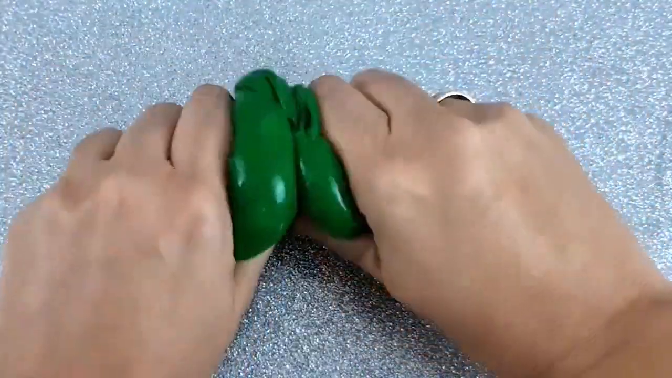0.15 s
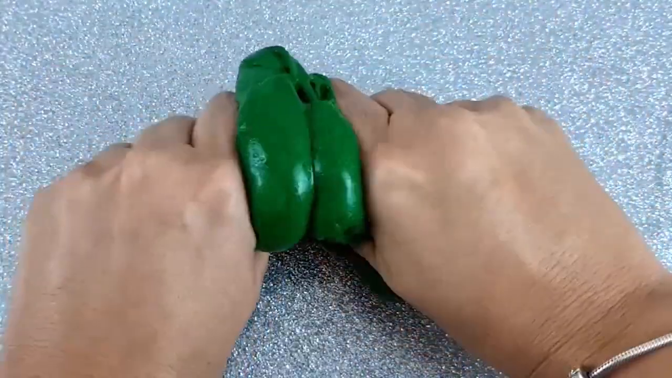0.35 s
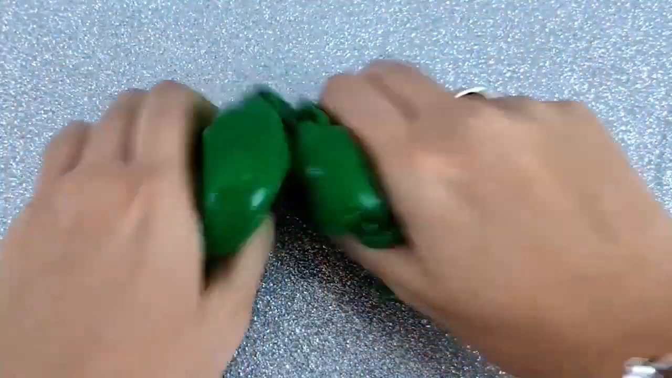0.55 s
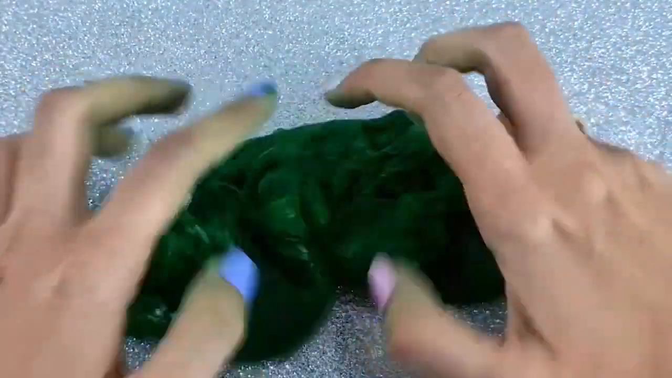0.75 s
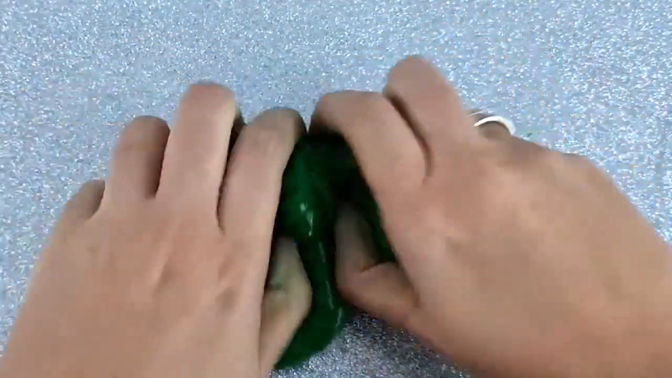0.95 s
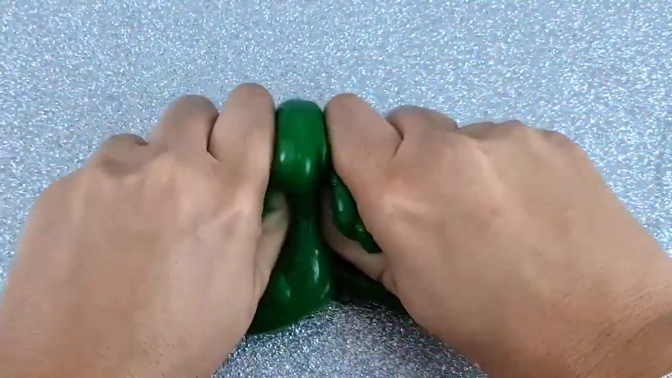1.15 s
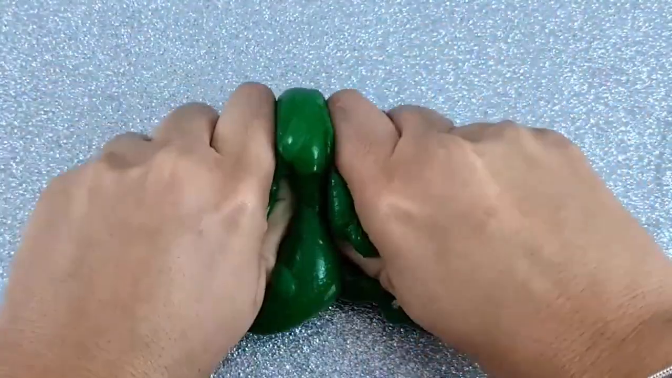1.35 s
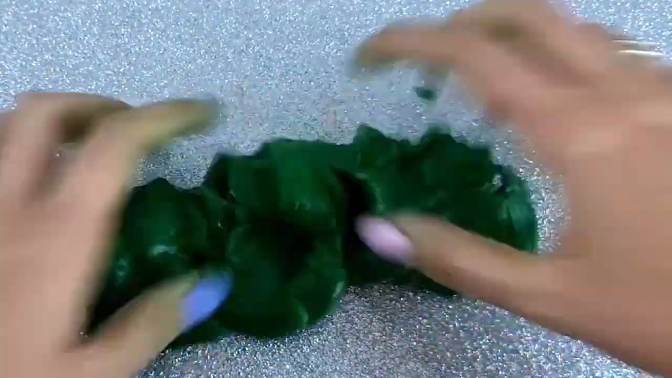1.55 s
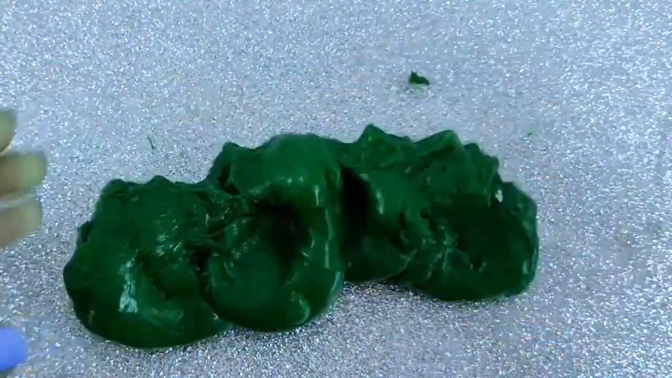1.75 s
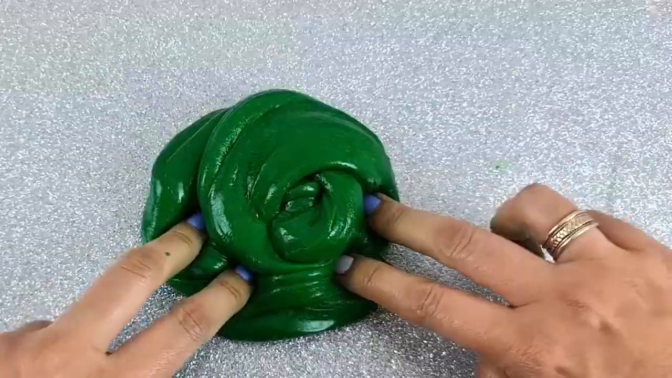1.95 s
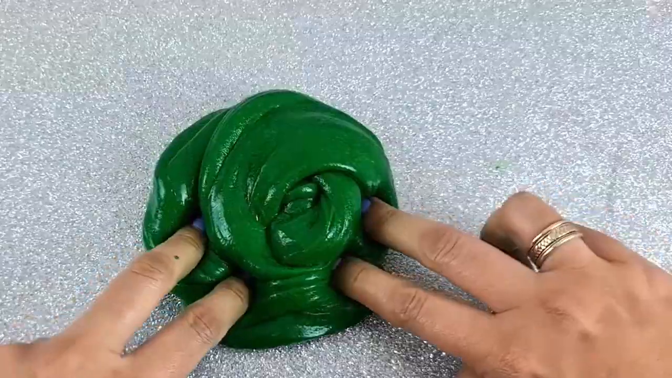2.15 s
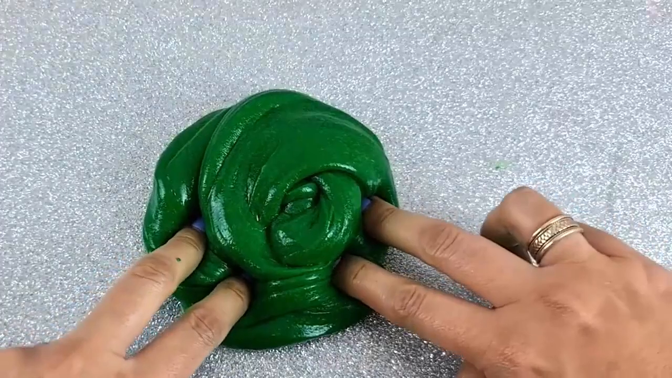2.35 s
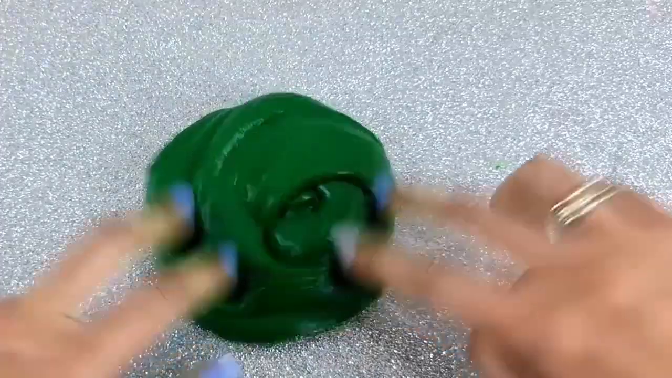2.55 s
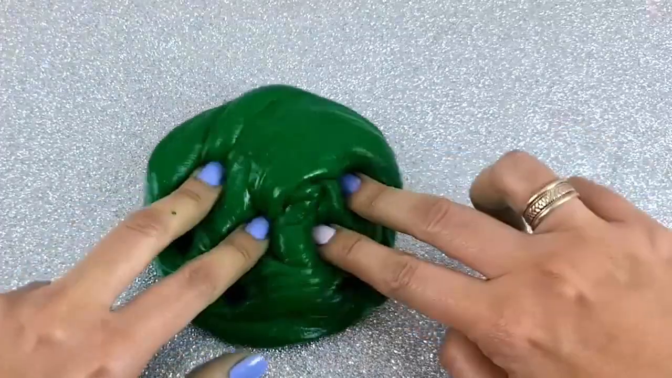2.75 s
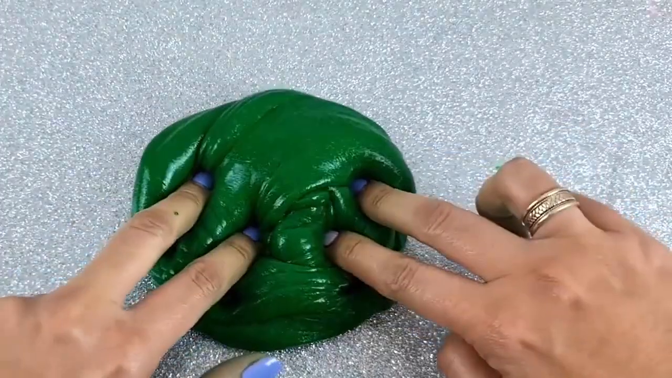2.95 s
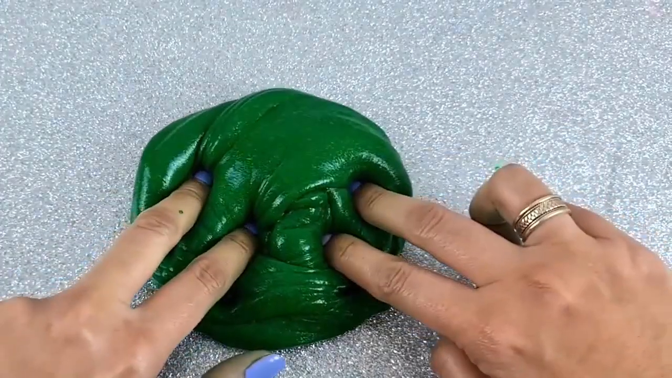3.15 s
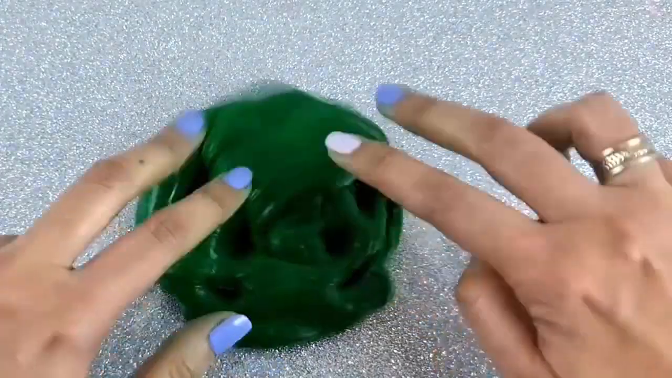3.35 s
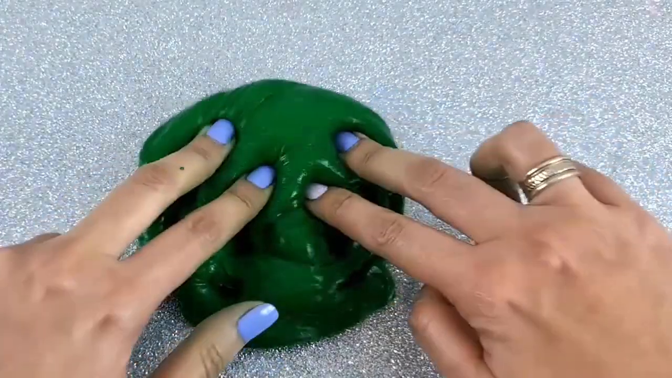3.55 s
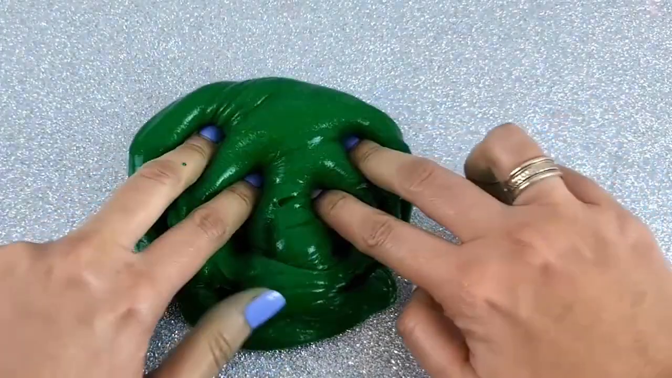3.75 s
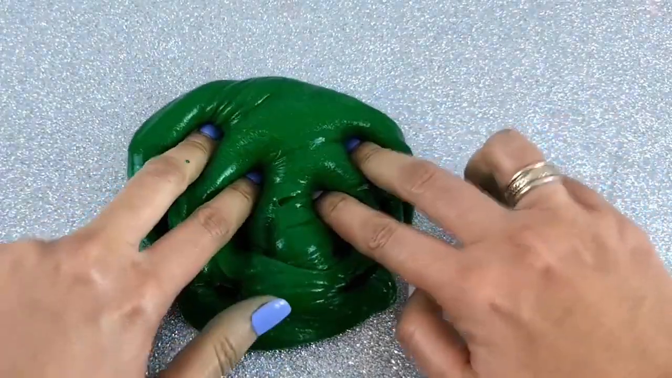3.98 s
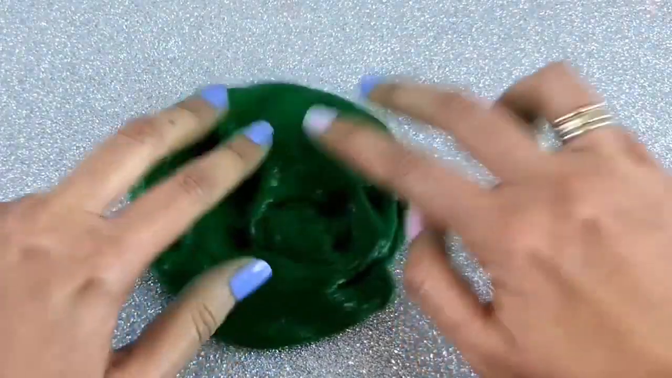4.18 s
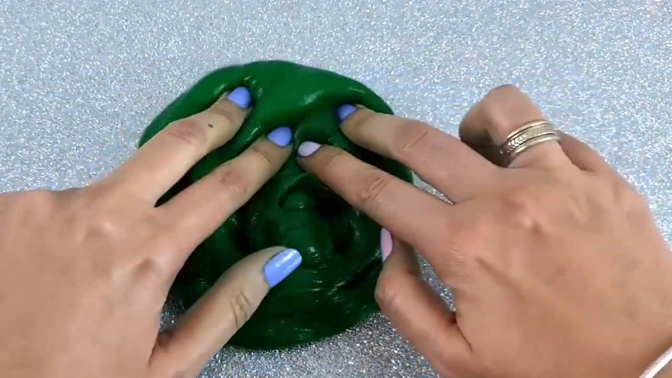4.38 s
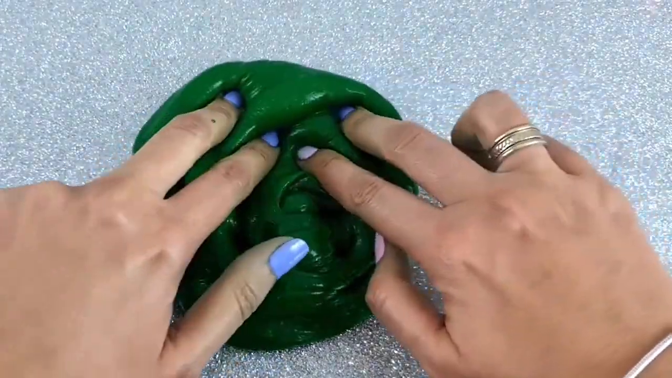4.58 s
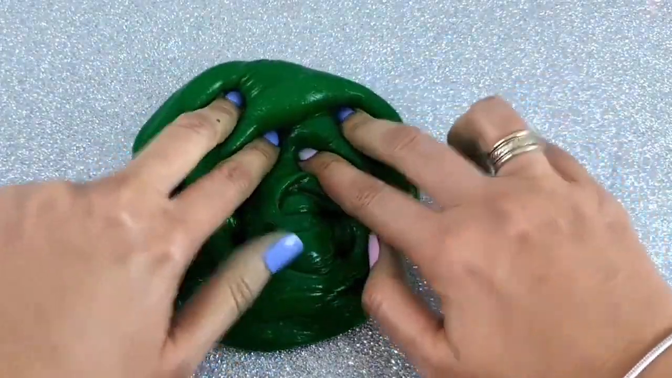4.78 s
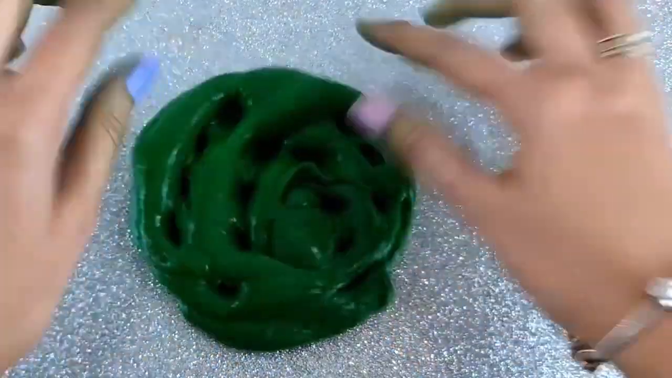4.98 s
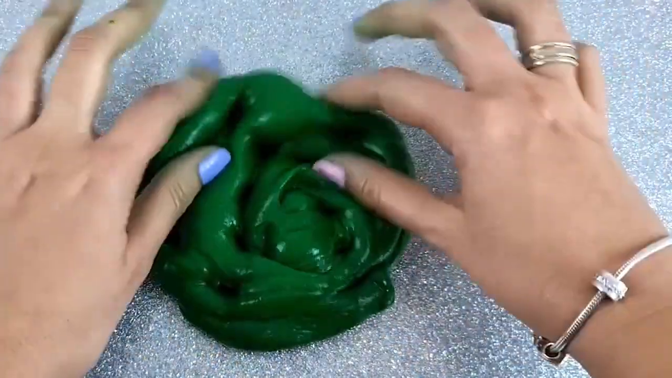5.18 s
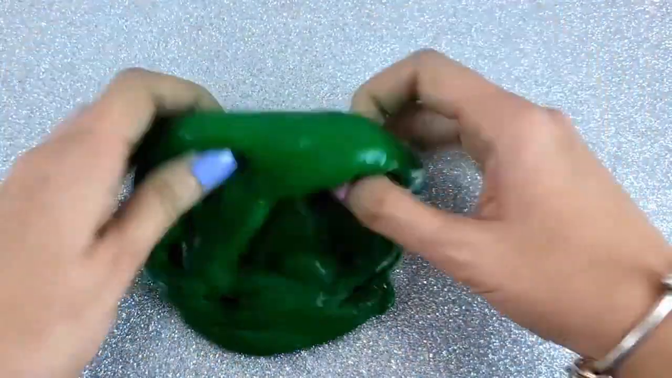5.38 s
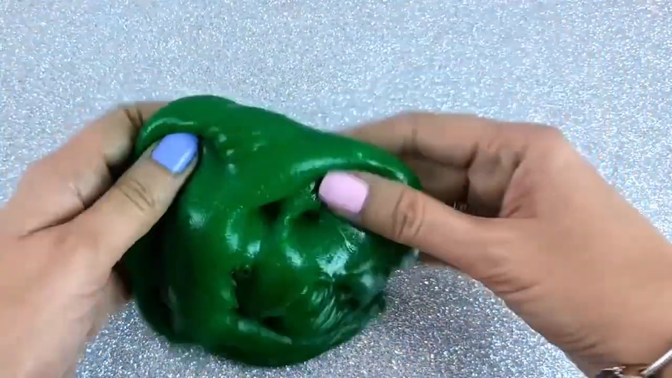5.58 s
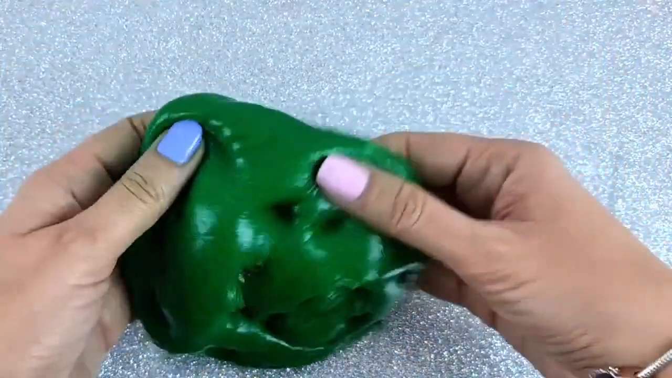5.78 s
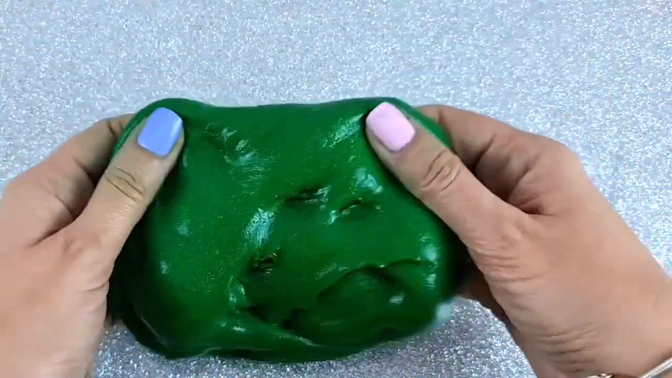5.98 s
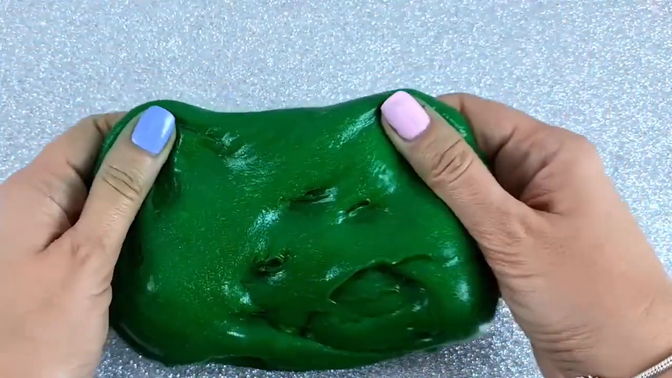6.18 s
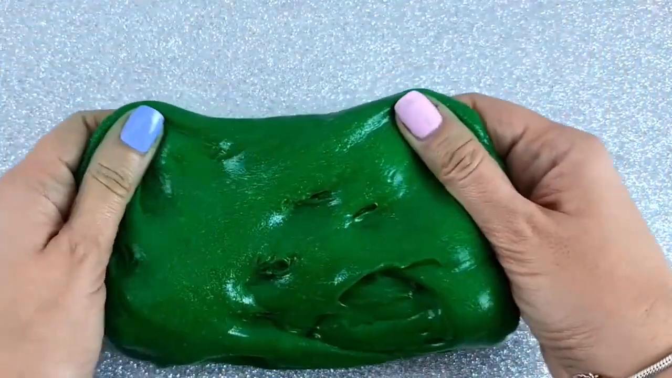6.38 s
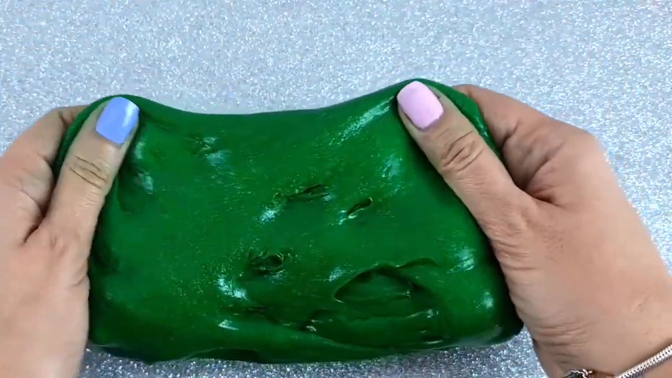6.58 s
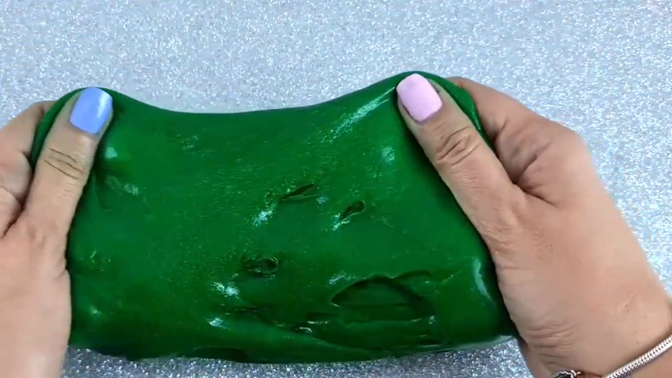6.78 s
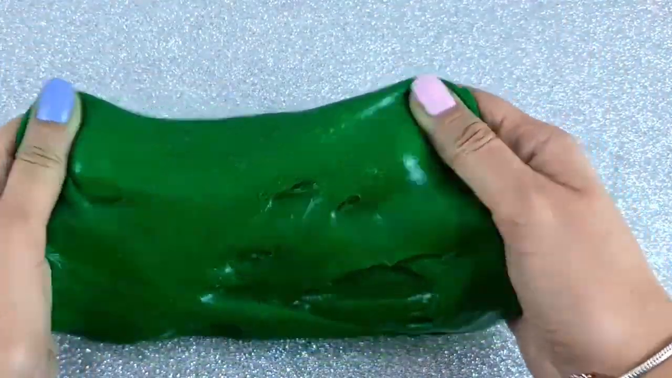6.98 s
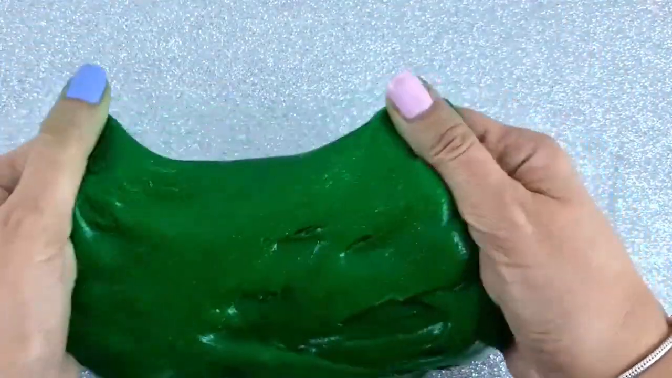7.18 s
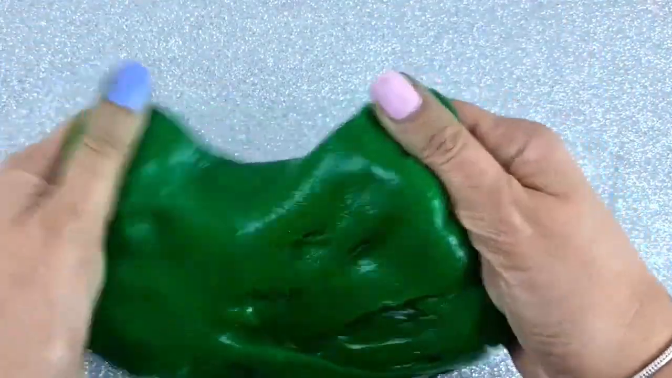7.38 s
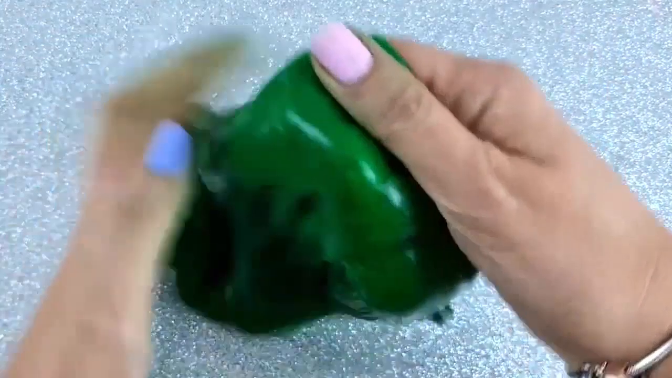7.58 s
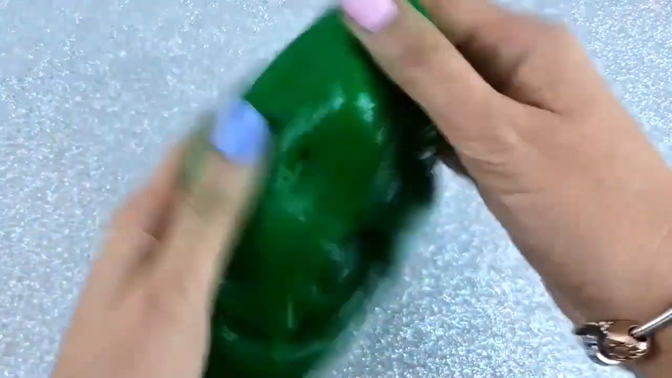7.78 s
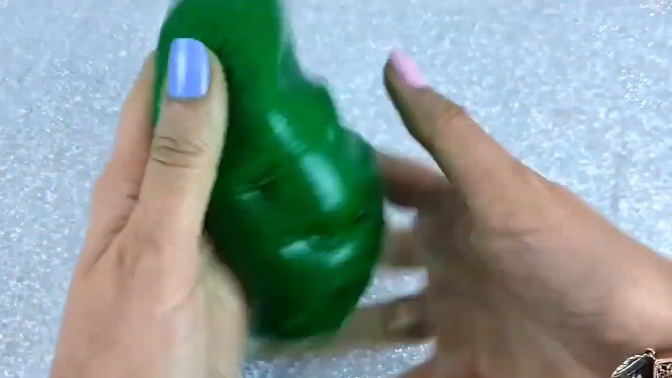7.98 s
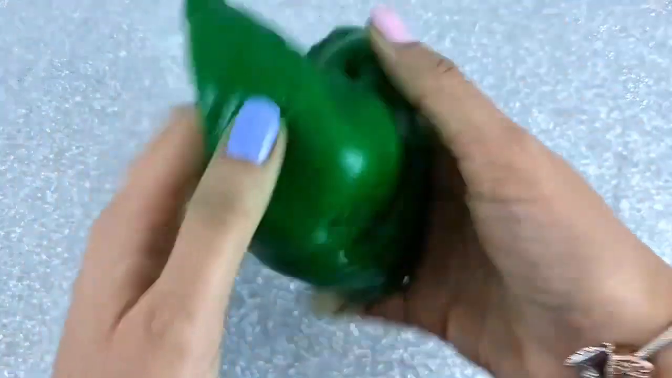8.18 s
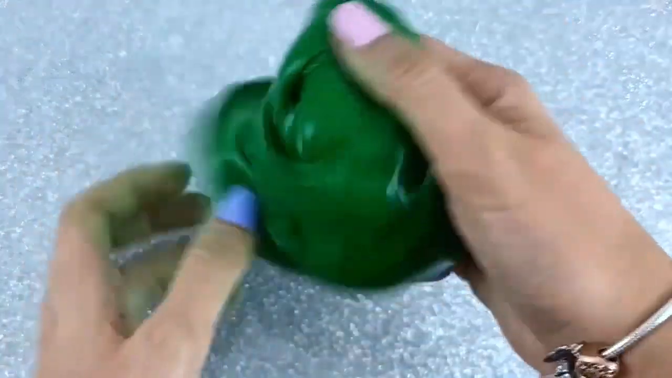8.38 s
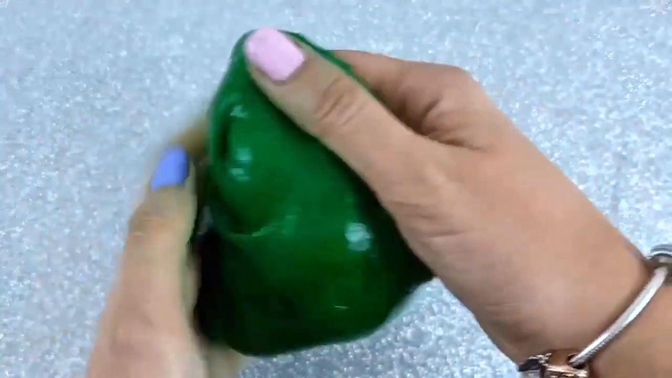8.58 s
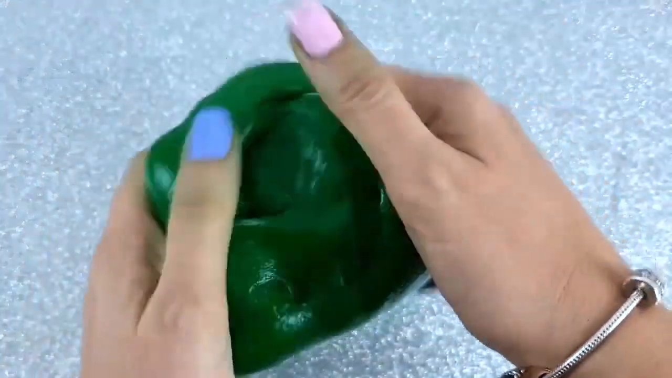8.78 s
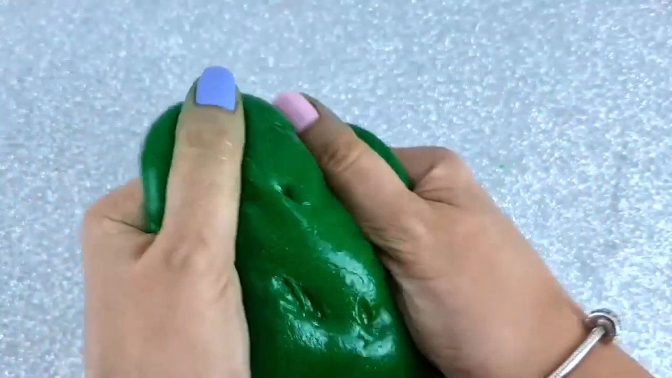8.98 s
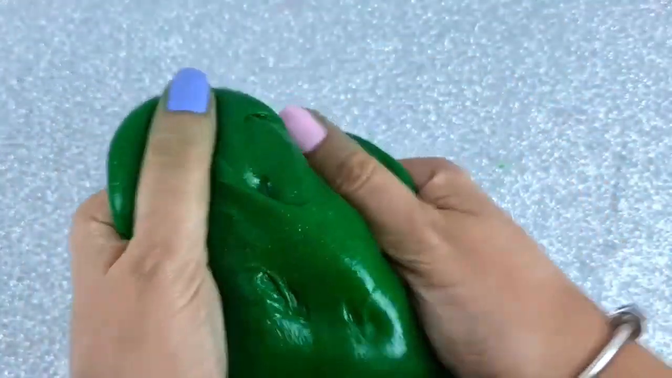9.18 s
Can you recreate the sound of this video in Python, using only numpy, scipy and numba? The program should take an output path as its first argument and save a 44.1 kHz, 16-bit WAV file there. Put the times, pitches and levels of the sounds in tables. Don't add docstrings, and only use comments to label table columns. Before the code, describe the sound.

Very close stereo phone pickup of thick wet slime handled on a table in a small hard room, with faint hiss and low air rumble. From 0 s a wet crackle builds quickly into a dense volley of hollow pops and bright snaps, peaking and clipping near 0.37 s. Smaller pops and squelches follow to 0.8 s, then another squeeze from 1.15 to 1.45 s and a loud pop at 1.67 s. After near quiet, abrupt clusters of pops with sharp tearing clicks and low table thumps strike at 2.67, 3.45, 4.22 and 5.0 s, each decaying in under half a second. A soft squish comes at 5.4 s. Stretching from 6 to 7.3 s gives only fine high ticks and fizz. Wet snaps at 7.39 and 7.55 s lead to squelchy folding and small ringing bubbles until 8.9 s. Loud pops and snaps, with a tiny squeak, erupt at 9.06-9.2 s.

```python
import sys
import numpy as np
from scipy import signal
from scipy.io import wavfile
from scipy.ndimage import uniform_filter1d
from numba import njit

SR = 44100
rng = np.random.default_rng(int(sys.argv[2]) if len(sys.argv) > 2 else 0)


def unload_wav(signal):
    wavfile.write(
        sys.argv[1],
        SR,
        np.round(np.clip(np.atleast_2d(signal).T, -1, 1) * 32767).astype(np.int16),
    )


def makeup_ratio(level_db):
    decades = np.asarray(level_db, float) / 20
    return 10 ** decades


N = 407484


def band(x, lo_hz, hi_hz, order=2):
    return signal.sosfilt(signal.butter(order, [lo_hz, min(hi_hz, .45 * SR)], "band", fs=SR, output="sos"), x)


def unit(x):
    return x / np.sqrt(np.mean(x ** 2))


def walk(rate_hz):
    hold = int(SR / rate_hz)
    steps = np.repeat(rng.standard_normal(N // hold + 1), hold)
    return unit(uniform_filter1d(steps, hold)[:N])


@njit
def grains(s, hz, cycles, glide, size, pan, lag):
    out = np.zeros((2, N + 9000))
    for k in range(len(s)):
        for c in range(2):
            at = max(s[k] * SR + 20 + c * lag[k], 0.)
            i0 = int(at)
            gain = size[k] * pan[k] ** (.5 - c)
            for i in range(1, min(int(cycles[k] * SR / hz[k]), 8000)):
                turns = (i + i0 - at) * hz[k] / SR
                phase = turns * (1 + glide[k] * turns / cycles[k])
                envelope = min(turns, 1.) ** 2 * np.exp(-6.9 * turns / cycles[k])
                out[c, i0 + i] += gain * envelope * np.sin(2 * np.pi * phase)
    return out[:, 20:N + 20]


ATTACK_DB_PER_S, RELEASE_DB_PER_S = 2203, 278


def gesture(start_s, hold_s, db):
    t, gain = np.arange(N) / SR, np.zeros(N)
    for s, hold, level_db in zip(start_s, hold_s, db):
        near = slice(max(int((s - .1) * SR), 0), int((s + hold + .4) * SR))
        before = np.maximum(s - t[near], 0)
        after = np.maximum(t[near] - s - hold, 0)
        fall = ATTACK_DB_PER_S * before + RELEASE_DB_PER_S * after
        gain[near] = np.hypot(gain[near], makeup_ratio(level_db - fall))
    return gain


def crackle(work, hz, octaves, cycles, scatter_db, count, drift=.05, patchy_db=2.5):
    u, g = rng.random((count, 3)).T, rng.standard_normal((count, 2)).T
    s = u[0] * N / SR
    at = (s * SR).astype(int)
    size = makeup_ratio(-scatter_db * np.log(.015 + u[1])) * np.sign(g[0])
    pitch = np.clip(hz * 2 ** (octaves * g[1] + drift * walk(14.0)[at]), 150., 17000.)
    busy = uniform_filter1d(1. * (work > makeup_ratio(-84)), 2000) > 1e-6
    on = busy[at]
    pan, lag = makeup_ratio(2 * g[0, on]), 30 * u[2, on] - 12
    dense = grains(s[on], pitch[on], cycles + 0 * s[on], 0 * s[on], size[on], pan, lag)
    dense = dense / np.sqrt(np.mean(dense[:, busy] ** 2))
    return dense * work * makeup_ratio(patchy_db * walk(40.0))


# f/Hz, density/dB.
FLOOR_SPECTRUM = [(90, 5), (160, -14.5), (300, -6.5), (1200, -13.5), (5000, -17), (8000, -12.5),
                  (10000, -24.5), (16000, -9.5)]
FLOOR_DB = -61
# t/s, level/dB.
STIRRED_AIR = [
    (0, -66.5),
    (1., -62),
    (2.3, -68.5),
    (5., -66.5),
    (6.799, -63.5),
    (7.6, -53),
    (7.848, -64),
    (9.24, -66),
]


def floor():
    f, density_db = np.transpose(FLOOR_SPECTRUM)
    out, swell = 0, walk(8.1)
    for hz in 100 * 2 ** np.arange(0, 7.4, .5):
        db = np.interp(np.log(hz), np.log(f), density_db) + 0.33 * swell + 0.98 * walk(29.0)
        out = out + makeup_ratio(db) * band(rng.standard_normal((2, N)), hz * 0.92, hz * 1.19)
    s, stirred_db = np.transpose(STIRRED_AIR)
    low = rng.standard_normal((3, N))
    rumble = unit(band(low[0] + 11.0 * low[1:], 43.0, 100.))
    rumble_db = np.interp(np.arange(N) / SR, s, stirred_db) + 0.5 * walk(21.0)
    return unit(out) * makeup_ratio(FLOOR_DB) + rumble * makeup_ratio(rumble_db)


# start t/s, hold t/s, level/dB, thin film over thick paste level/dB.
KNEADING = [(0, 0.28, -54, -9.5), (0.222, 0.047, -44, -5.5), (0.297, 0.055, -31, 2),
            (0.377, .045, -35.5, 7), (0.477, 0.033, -41.5, -1), (0.618, .025, -44, -11),
            (0.648, .05, -42, -9.5), (0.732, 0.02025, -47.5, -7), (0.764, 0.057, -52, -5),
            (0.995, 0.1605, -60.5, -2.5), (1.158, 0.097, -46.5, -2), (1.326, 0.042, -41, 4),
            (1.394, 0.016, -44, 32), (1.565, .03, -46, -9), (1.597, 0.042, -36, -7),
            (2.043, .12, -72.5, 18.5), (5.337, 0.22, -58.5, -7), (5.784, 0.0211, -68, -1.5),
            (6.393, 0.35, -73.5, 3.5), (6.8, 0.05, -67, 25), (6.963, 0.0475, -65, 1.5),
            (7.026, 0.199, -63, 8), (7.242, 0.019, -59.5, 10), (7.341, 0.017, -57.5, 4),
            (7.385, 0.019, -39, 5.5), (7.549, 0.0255, -44.5, 1), (7.602, 0.02, -54.5, -1.5),
            (7.837, 0.029, -53, -8), (7.929, 0.035, -59.5, -2.5), (8.076, 0.019, -47, -8),
            (8.263, 0.113, -58.5, -11.5), (8.421, 0.037, -65.5, -6.5), (8.497, 0.032, -59.5, -9),
            (8.597, .03, -61.5, -9), (8.704, 0.019, -61, -2), (8.879, .03, -65, 17.5),
            (9.038, 0.016, -57, -3), (9.071, .04, -45.5, -9), (9.115, .02, -28, 1.5),
            (9.192, .04, -32.5, -6.5)]
LEAD_IN_S, LEAD_IN_DB = .013, -46


def kneading():
    lead_ins = [(s - LEAD_IN_S, LEAD_IN_S, LEAD_IN_DB, 5) for s, *_ in JOLTS[3:7]]
    s, hold, db, film_db = np.transpose(KNEADING + lead_ins)
    paste_work = gesture(s, hold, db - np.maximum(film_db, 0))
    film_work = gesture(s, hold, db + np.minimum(film_db, 0))
    squelch = crackle(paste_work, 1550., 0.37, 9.2, 3.4, count=6500) * makeup_ratio(5.0)
    fizz = crackle(film_work, 6000., 0.47, 4.6, 2.3, count=20000, patchy_db=0.5) * makeup_ratio(8.0)
    return squelch, fizz


# start t/s, hold t/s, level/dB.
SQUASHES = [(0, 0.017, -52.5), (0.31, 0.033, -39), (0.803, 0.042, -48), (1.055, 0.064, -57),
            (1.373, 0.017, -43.5), (1.536, 0.058, -47), (5.426, 0.013, -33), (5.898, 0.088, -63),
            (6.635, 0.11, -66), (7.636, 0.0083, -44.5), (7.663, .012, -56), (8.072, 0.054, -42),
            (8.17, 0.028, -51), (8.23, 0.12, -49.5), (8.403, 0.16, -55), (8.563, 0.03, -47),
            (8.61, .02, -45), (9.108, 0.012, -50), (9.2, .05, -50)]


def squish():
    return crackle(gesture(*np.transpose(SQUASHES)), 430.0, 0.2, 14.0, 3.2, count=5000) * makeup_ratio(-4.5)


# t/s, peak level/dB, cavity f/Hz.
SQUEEZE_BURSTS = [(.091, -30.5, 1510), (0.13, -20, 1500), (0.225, -18.5, 1620), (.25, -17.5, 1290),
                  (.26, -12.5, 1490), (0.284, -9.5, 1540), (.302, -11, 550), (0.355, -14, 1340),
                  (.3703, 6.5, 1200), (0.373, 3, 1400), (0.3895, -3.5, 1100), (.391, -3.5, 653),
                  (.313, -16, 552), (0.331, -18.5, 990), (.398, -11.5, 900), (0.415, -16, 1100),
                  (0.421, -19, 560), (0.3725, -3, 2000), (0.629, -19, 1660), (0.666, -15.5, 1970),
                  (.67, -14, 1420), (0.743, -24, 1560), (.82, -30, 462), (.999, -35.5, 442),
                  (1.151, -34, 1200), (1.18, -40, 1320), (1.245, -20.5, 1510), (1.304, -19, 1530),
                  (1.324, -17, 1150), (1.329, -28.5, 1200), (1.338, -20, 2000), (1.365, -21, 1440),
                  (1.373, -24, 990), (1.358, -24, 1490), (1.425, -40, 1530), (1.383, -22, 1380),
                  (1.4, -29, 1600), (1.522, -28.5, 1150), (1.624, -12, 1510), (1.65, -22, 1297),
                  (1.56, -34.5, 576), (1.598, -24.5, 1360), (1.668, -2.5, 920), (1.672, -16, 760)]
# t/s, peak level/dB, cavity f/Hz.
POKE_BURSTS = [(2.299, -30.5, 1086), (2.672, -7, 1494), (2.6731, -2, 987), (2.681, -2.5, 863),
               (2.676, -6, 452.6), (2.678, 0, 1450), (2.691, -5, 856), (3.4365, -7.5, 480.5),
               (3.4425, -3, 1106), (3.4475, -4, 1450), (3.446, -0.5, 781), (3.4493, 1, 632.5),
               (3.454, -1.5, 889), (3.4574, 2, 634), (3.737, -28.5, 1111), (3.739, -32, 620),
               (3.799, -24, 805), (4.212, -16, 564), (4.2215, -1, 900), (4.2228, -4, 1379),
               (4.226, 0, 622.8), (4.2383, -1, 947), (4.241, -6, 1100), (4.234, -8, 1550),
               (4.238, 1.5, 600), (4.2445, -4, 620), (4.2505, -3, 643), (4.988, -10, 2578),
               (5.003, -10, 761), (5.0125, -2.5, 722.7), (5.017, -3, 1154)]
# t/s, peak level/dB, cavity f/Hz.
FOLD_BURSTS = [(5.353, -36.5, 830), (5.428, -26, 347), (5.429, -24, 1098), (7.385, -18.5, 1023),
               (7.395, -13, 1260), (7.553, -26, 1470), (7.808, -29, 2170), (7.994, -29, 1205),
               (8.081, -31.5, 312), (8.568, -32.5, 402), (9.056, -19, 1260), (9.0692, -14.5, 996),
               (9.083, -18, 1100), (8.602, -35.5, 1504), (8.082, -25, 1000), (9.058, -14, 664),
               (9.12, -2.5, 1160), (9.15, -9, 1300), (9.193, -2.5, 744), (9.194, 3.5, 1390)]


def pockets(rows, cycles, trim_db, sag=0.096):
    s, db, hz = np.transpose(rows)
    u = rng.random((len(s), 5)).T
    size = makeup_ratio(db + trim_db) * np.sign(u[2] - .5)
    pan, lag = makeup_ratio(6.0 * u[4] - 3.0), 8 * u[3] - 5
    return grains(s, hz, cycles * (1.04 + 0.4 * u[0]), -sag * u[1], size, pan, lag)


def bursts():
    rows = np.array(SQUEEZE_BURSTS + POKE_BURSTS + FOLD_BURSTS, float)
    near = pockets(rows, 6.84, 5.0)
    lip_slap = pockets(rows * [1, 1, 1.9], 4.4, 0.98)
    all_round = pockets(rows, 6.64, 3.0) + lip_slap
    return near, all_round


# t/s, peak level/dB, centre f/Hz, sparkle above 9 kHz level/dB.
SQUEEZE_TEARS = [(0.0926, -28, 4190, -16.5), (0.142, -32.5, 2890, -25.5), (0.284, -31, 6566, -14),
                 (0.3033, -2, 4750, -7.5), (0.331, -12.5, 4320, -10.5), (.3545, -14, 4650, -7.5),
                 (0.371, -6, 4186, -18.5), (0.43, -14, 5970, -9.5), (0.39, -6.5, 5220, -15),
                 (0.419, -14, 5990, 0.5), (.4763, -21.5, 3060, -11.5), (0.731, -26.5, 6770, -26.5),
                 (0.821, -31, 3064, -32), (1.0022, -39.5, 3080, -10), (1.1538, -13, 3856, -36.5),
                 (1.181, -23.5, 4460, -29.5), (1.206, -26.5, 6480, -7.5), (1.2369, -22, 4060, -21.5),
                 (1.3045, -30, 3156, -20.5), (1.3252, -22, 2530, -29), (1.335, -26, 6725, 1),
                 (1.341, -11.5, 4520, -9.5), (1.3582, -18.5, 8105, -15.5), (1.426, -11.5, 4028, -29.5),
                 (1.4295, -18, 3704, -32.5), (1.431, -16.5, 3824, -35), (1.438, -24.5, 3937, -33.5),
                 (1.562, -25.5, 5030, -10), (1.6184, -24.5, 3598, -17.5), (1.6674, -22.5, 3096, -22)]
# t/s, peak level/dB, centre f/Hz, sparkle above 9 kHz level/dB.
POKE_TEARS = [(2.2976, -35, 3950, -10.5), (2.6629, -18.5, 3622, -12), (2.668, -19.5, 4003, -12.5),
              (2.6707, -8.5, 3040, -20), (2.675, -3, 4490, -15.5), (2.6771, 4, 5145, -15.5),
              (3.1449, -35, 10940, -18), (3.4383, -15, 3368, -14), (3.4418, -2.5, 3400, -11.5),
              (3.4443, -2, 4393, -12), (3.4485, 0, 3012, -14), (3.45, -11, 4022, -12.5),
              (3.4582, -5, 3618, -24.5), (3.8563, -33, 7795, -18.5), (4.2118, -24, 4973, -16),
              (4.219, -14.5, 3163, -15.5), (4.2218, 5, 4706, -14.5), (4.2235, 5.5, 7000, -17.5),
              (4.2367, 3, 4924, -16), (4.99, -3, 3573, -15.5), (4.9917, -2, 4070, -15),
              (5.0036, -8, 3468, -13.5), (5.012, 0, 5000, -13)]
# t/s, peak level/dB, centre f/Hz, sparkle above 9 kHz level/dB.
FOLD_TEARS = [(5.4279, -26, 4420, -40), (5.6196, -35.5, 6890, -21.5), (5.7887, -43, 7610, -15.5),
              (6.0198, -47.5, 13050, -9.5), (6.0321, -41, 11530, -7), (6.0609, -43.5, 10560, -9),
              (6.2461, -47.5, 11000, -9), (6.268, -47, 9000, -9), (6.6835, -26, 6570, -31.5),
              (6.8034, -23.5, 6140, -39.5), (6.812, -26, 6380, -33.5), (6.824, -29.5, 6850, -32),
              (6.853, -30, 6400, -37), (6.9712, -30, 6500, -22.5), (7.197, -32.5, 7840, -12),
              (7.213, -29.5, 7455, -30), (7.242, -24.5, 7110, -23), (7.3526, -33, 7150, -17),
              (7.3609, -34.5, 4600, -5), (7.386, -14.5, 4630, -17), (7.3937, -12, 5390, -14),
              (7.556, -25.5, 6400, -10.5), (7.7208, -32, 8180, -5), (7.808, -34, 7930, -19.5),
              (7.845, -31.5, 2620, -26), (8.082, -28, 3170, -28.5), (8.1585, -29, 3220, -28.5),
              (8.602, -38, 4000, -22), (8.8893, -26, 8315, -16), (9.0696, -29, 3380, -20),
              (9.0577, -32, 3510, -30.5), (9.085, -20, 3510, -32), (9.103, -6.5, 7910, -10),
              (9.122, -2, 4223, -14), (9.1234, -6.5, 7013, -4), (9.1388, -13.5, 5530, -20.5),
              (9.1946, -5.5, 2960, -19.5), (9.195, -2, 6903, -11)]
SNAP_OCTAVES, SNAP_OCTAVES_PER_DB = .6, .008


def snaps(spread_s=0.0031, cycles=10.0, trim_db=0.99, sparkle_trim_db=12.0, count=36):
    rows = np.array(SQUEEZE_TEARS + POKE_TEARS + FOLD_TEARS, float)
    s, db, hz, sparkle_db = np.repeat(rows, count, axis=0).T
    u = rng.random((len(s), 4)).T
    place = np.tile(np.linspace(-1, 2, count), len(rows))
    fine = place > 1
    octaves = 2 * (SNAP_OCTAVES + SNAP_OCTAVES_PER_DB * db) * place
    pitch = np.where(fine, 8500 * 2 ** (place - 1), hz * 2 ** octaves)
    fine_db = sparkle_db + sparkle_trim_db - 2.0 * (place - 1)
    db = db + trim_db + np.where(fine, fine_db, -14.0 * place ** 2) - 20 * (pitch > 15500)
    pitch = np.clip(pitch, 1200., 17000.)
    size = makeup_ratio(db) * np.sqrt(pitch / hz) * np.sign(u[3] - .5) * makeup_ratio(-9.0 * u[0] ** 4)
    pan, lag = makeup_ratio(6 * u[1] - 3), 14 * (u[2] - .4)
    delay_s = spread_s * u[0] ** np.where(fine, 2, 3.5)
    return grains(s + delay_s, pitch, cycles + 0 * s, 0 * s, size, pan, lag)


# f/Hz, t60/s, level/dB, likeness of the ports (-1 to 1).
ROOM_BANDS = [(152.2, 0.7, -7.5, 0.51), (300, 0.5, -2, 0.37), (625, 0.4, 7, -0.22), (1200, 0.44, 3, -0.18),
              (2400, 0.44, 8.5, -0.47), (4800, 0.43, 4.5, 0.43), (9000, 0.33, 9.5, -0.042),
              (14325, 0.27, 7, -0.68)]
ROOM_DB, ROOM_RISE_S = 1.5, 0.0034


def room(x):
    t = np.arange(int(.8 * SR)) / SR
    f, t60s, dbs, alikes = np.transpose(ROOM_BANDS)
    tail = 0
    uneven = makeup_ratio(4 * rng.standard_normal(len(t)) * np.exp(-t / .03))
    for hz in 110 * 2 ** np.arange(0, 7.4, .5):
        t60, db, alike = (np.interp(np.log(hz), np.log(f), c) for c in (t60s, dbs, np.clip(alikes, -1, 1)))
        mid, side = rng.standard_normal((2, len(t)))
        opposite = side * np.array([[1], [-1]])
        pair = (np.sqrt(1 + alike) * mid + np.sqrt(1 - alike) * opposite) * uneven
        wash = band(pair, hz / 2 ** .25, hz * 2 ** .25)
        swell = uniform_filter1d(wash ** 2, int(3 * SR / hz), axis=1) * 400 / hz + 1e-9
        tail = tail + makeup_ratio(db - 60 * t / t60) * wash / swell ** .2
    tail = tail * (1 - np.exp(-(t / ROOM_RISE_S) ** 2))
    tail = tail / np.sqrt(np.mean(np.sum(tail ** 2, axis=1)))
    return makeup_ratio(ROOM_DB) * signal.fftconvolve(x.mean(axis=0, keepdims=True), tail, axes=1)[:, :N]


def scattered(x, gain_db, fill_s):
    f, t60s, dbs, _ = np.transpose(ROOM_BANDS)
    out = 0
    for hz in 900 * 2 ** np.arange(0, 4.3, .4):
        t60, db = (np.interp(np.log(hz), np.log(f), c) for c in (t60s, dbs))
        edges = hz / 2 ** .2, hz * 2 ** .2
        drain, fill = makeup_ratio(-120 / (t60 * SR)), np.exp(-1 / (fill_s * SR))
        power = np.mean(band(x, *edges) ** 2, axis=0)
        energy = signal.lfilter([(1 - drain) * (1 - fill)], np.poly([drain, fill]), power)
        grainy = makeup_ratio(db - dbs[-4:].mean() + 2.8 * walk(150.0))
        out = out + grainy * np.sqrt(np.abs(energy)) * unit(band(rng.standard_normal((2, N)), *edges))
    return makeup_ratio(gain_db) * out


# start t/s, hold t/s, level/dB.
FINEST_FILMS = [
    (.3, .12, -49.5),
    (1.197, .02, -57),
    (1.335, .07, -45.5),
    (1.562, 0.11, -55),
    (2.035, .1, -70),
    (6.02, 0.054, -62.5),
    (6.245, .03, -67),
    (6.998, 0.22, -69),
    (8.885, 0.028, -61.5),
]


def sparkle():
    return crackle(gesture(*np.transpose(FINEST_FILMS)), 10000.0, 0.25, 12.0, 2.5, count=12000) * makeup_ratio(7.5)


# t/s, table peak level/dB, puff level/dB.
JOLTS = [(0.366, -62, -51), (0.999, -59, -56), (1.102, -38.5, -58), (2.673, -17.5, -34), (3.446, -13, -45),
         (4.219, -9.5, -40), (4.995, -27, -71), (5.423, -28.5, -73), (7.65, -42, -53), (8.076, -52.5, -74),
         (8.566, -28, -65), (9.112, -55, -54), (9.185, -52, -48.5)]
# f/Hz, level/dB, t60/s.
TABLE_MODES = [(146.4, -31, 0.3), (194.6, -33, 0.2), (278, -27, 0.14), (417, -21.5, 0.035)]


def table():
    t = np.arange(SR) / SR
    ring = sum(makeup_ratio(db + 17.5) * np.sin(2 * np.pi * hz * t) * makeup_ratio(-60 * t / t60) for hz, db, t60 in TABLE_MODES)
    s, db, _ = np.transpose(JOLTS)
    push = np.zeros(N)
    push[(s * SR).astype(int)] = makeup_ratio(db)
    return signal.fftconvolve(push, ring * np.minimum(t / 0.03, 1))[:N]


PUFF_RISE_S, PUFF_T60_S, PUFF_HZ = .004, 0.28, 30


def puffs():
    t = np.arange(SR // 2) / SR
    s, _, db = np.transpose(JOLTS)
    push = np.zeros(N)
    push[(s * SR).astype(int)] = makeup_ratio(db)
    gust = makeup_ratio(-60 * t / PUFF_T60_S) * np.minimum(t / PUFF_RISE_S, 1)
    swell = signal.fftconvolve(push, gust)[:N]
    low = rng.standard_normal((3, N))
    return swell * unit(band(low[0] + 0.47 * low[1:], PUFF_HZ / 2, PUFF_HZ * 2, order=1))


# t/s, peak level/dB, f/Hz.
TRAPPED_BUBBLES = [(1.668, -40, 964), (2.11, -49, 1291), (5.79, -49, 852), (5.795, -48.5, 1284),
                   (6.42, -50, 1129), (6.966, -46, 3000), (7.025, -44.5, 2425), (7.028, -53.5, 1100),
                   (7.137, -50, 1007), (7.167, -45.5, 1190), (7.249, -48, 2540), (7.308, -51, 1117),
                   (7.572, -20, 1410), (7.628, -48, 1490), (7.641, -29, 2720), (7.647, -34, 2690),
                   (7.726, -41, 1540), (7.733, -44, 1970), (7.866, -38, 2800), (7.88, -35, 2010),
                   (7.868, -39, 1200), (7.842, -31, 1040), (7.85, -34, 2820), (7.934, -37, 1640),
                   (7.934, -32.5, 1040), (7.964, -43, 2400), (7.995, -28.5, 2610), (7.996, -36, 1730),
                   (7.997, -27, 1200), (8.28, -36.5, 2090), (8.33, -45, 2070), (8.368, -41.5, 2230),
                   (8.43, -48, 1460), (8.501, -46, 1223), (8.518, -43, 1124), (8.707, -33.5, 1090),
                   (8.713, -28.5, 1134), (8.728, -37, 1090), (8.74, -45, 1190), (8.75, -46, 1070),
                   (8.77, -49, 1080), (8.79, -52, 1050), (9.151, -22, 1412)]


def blips():
    return pockets(TRAPPED_BUBBLES, 31.0, 0.89, sag=0.055)


# start t/s, hold t/s, level/dB.
SKIN_TEARS = [
    (6.682, .01, -55),
    (6.803, 0.029, -38.5),
    (6.852, 0.033, -44),
    (6.91, .05, -52.5),
    (6.967, 0.034, -52.5),
    (7.043, 0.26, -58),
]


def stretch():
    return crackle(gesture(*np.transpose(SKIN_TEARS)), 6700., 0.12, 16.0, 2.67, count=12000)


SQUEAK_S, SQUEAK_LENGTH_S, SQUEAK_DB, SQUEAK_HZ = 9.16, .036, -24, 1680


def squeak():
    t = np.arange(N) / SR - SQUEAK_S
    turn = np.clip(t / SQUEAK_LENGTH_S, 0, 1)
    envelope = np.sqrt(np.sin(np.pi * turn) + 1e-12)
    return makeup_ratio(SQUEAK_DB) * envelope * np.sin(2 * np.pi * SQUEAK_HZ * t * (1 - .015 * turn))


def scene():
    squelch, fizz = kneading()
    wet = squelch + squish() + table()
    bright = fizz + sparkle() + snaps()
    near, all_round = bursts()
    ringing = blips() + squeak()
    direct = wet + bright + near + ringing
    reverberant = room(wet + all_round + makeup_ratio(-3.0) * ringing + makeup_ratio(-8.5) * bright)
    hiss = scattered(bright, -6.0, .0015)
    return direct + reverberant + hiss + floor() + puffs() + stretch()


def band_limit(x):
    return signal.sosfilt(signal.butter(12, 15700, fs=SR, output="sos"), x)


MIC_DIP_HZ, MIC_DIP_WIDTH_HZ, MIC_DIP_SHARE = 10500., 3500., .15
MIC_STEP_HZ, MIC_STEP_SHARE = 8400., 0.26


def record(dry):
    dip = band(dry, MIC_DIP_HZ - MIC_DIP_WIDTH_HZ / 2, MIC_DIP_HZ + MIC_DIP_WIDTH_HZ / 2, order=1)
    top = signal.sosfiltfilt(signal.butter(6, MIC_STEP_HZ, "high", fs=SR, output="sos"), dry)
    clipped = np.clip(dry - MIC_DIP_SHARE * dip - MIC_STEP_SHARE * top, -1, 1)
    return band_limit(clipped)


dry = scene()
out = record(dry)
unload_wav(out)
```